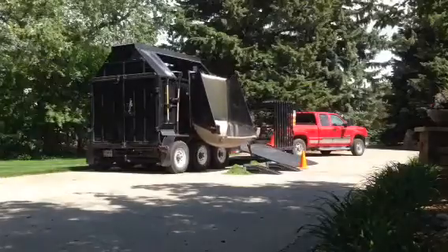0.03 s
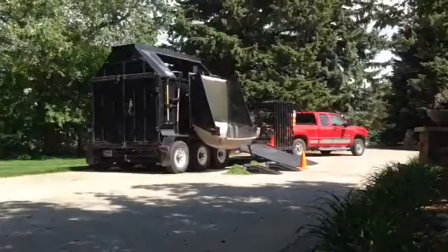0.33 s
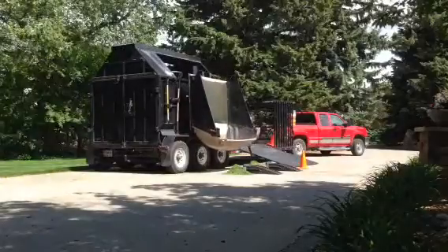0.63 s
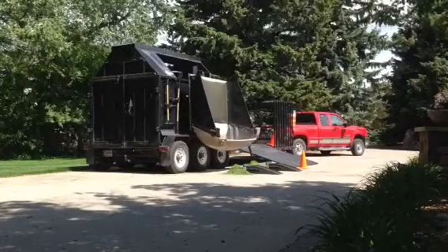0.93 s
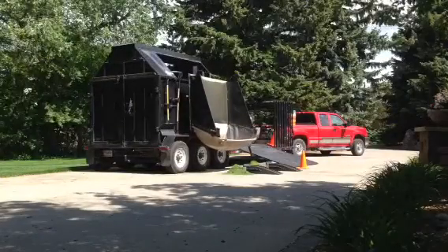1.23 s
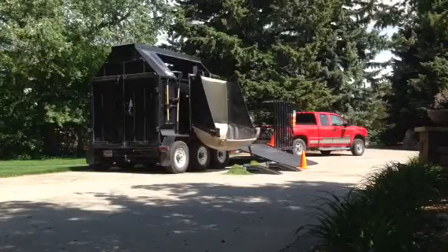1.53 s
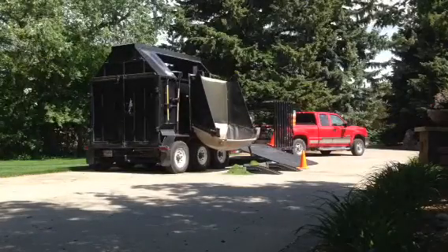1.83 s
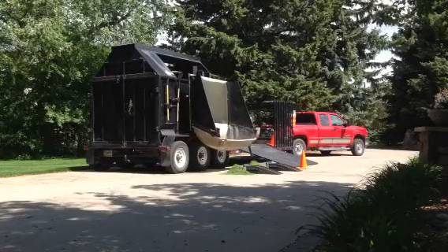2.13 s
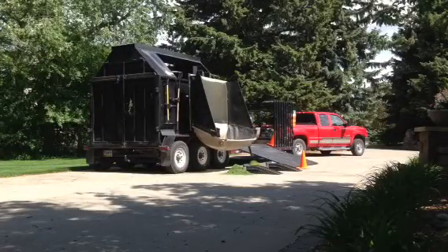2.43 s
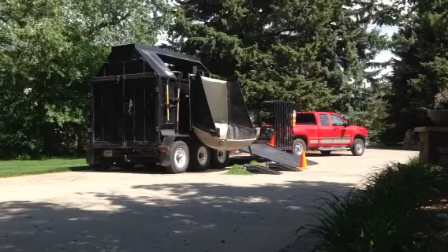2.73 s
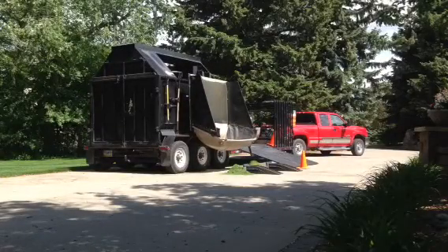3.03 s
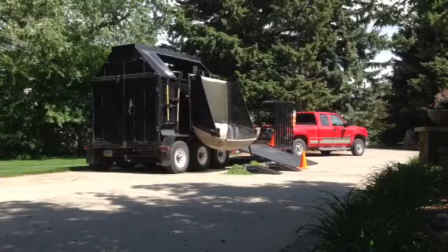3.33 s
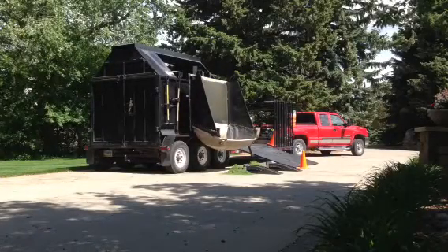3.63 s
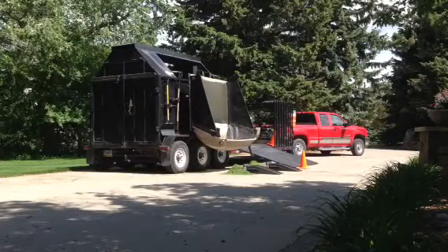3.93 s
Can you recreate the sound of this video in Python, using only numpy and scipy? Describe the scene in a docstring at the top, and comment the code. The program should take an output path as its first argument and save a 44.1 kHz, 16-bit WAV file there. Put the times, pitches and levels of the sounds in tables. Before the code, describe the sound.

A small engine driving a suction fan drones outdoors, fading and dropping to a slower beat.

```python
"""Truck loader on a driveway

A small engine drives a suction fan, some way off. Periodic exhaust puffs throb under the fan's
turbulent roar, its whines and the clatter of the machine; the whole sound fades. At about 2.35 s
the throttle is closed: the engine coasts down, then catches at a slower, loping beat."""
import sys
import numpy as np
from scipy import signal
from scipy.fft import rfft, irfft
from scipy.io import wavfile
from scipy.ndimage import uniform_filter1d

SR = 44100
rng = np.random.default_rng(int(sys.argv[2]) if len(sys.argv) > 2 else 0)


def put_to_file(sound):
    """Save the sound as 16-bit audio at rate SR, in the file named by the first command-line argument."""
    columns = np.atleast_2d(sound).T  # one column per channel
    safe = np.clip(columns, -1, 1)
    whole_steps = np.round(safe * 32767)
    wavfile.write(sys.argv[1], SR, whole_steps.astype(np.int16))


N = 176400
TIME = np.arange(N) / SR
BINS = np.fft.rfftfreq(N, 1 / SR)
THROTTLE_CLOSES_S, CATCHES_S = 2.36, 3.27
# Envelope common to the fan's roar and whines. Each row: time in seconds, level in dB.
FAN_LEVEL = [(0, -23), (0.15, -24), (0.45, -28.5), (0.85, -33), (1.3, -35.5), (1.9, -39), (2.45, -38),
             (2.8, -40.5), (3.05, -42.5), (3.5, -44.5), (3.62, -43), (4, -46)]


def exhaust(turns, closed, lope=0.13, flutter=0.069, jitter_turns=.003):
    """One puff per cycle makes a harmonic series; at low throttle strong and weak puffs alternate."""
    # Each row: time in seconds, then levels in dB of order 2, order 3 and the higher orders together.
    levels = [(0.0, -24.4, -28.4, -22.4), (0.3, -23.4, -28.9, -22.2), (0.65, -25.5, -35.4, -26.4),
              (1.0, -26.7, -32.4, -28.7), (1.3, -32.3, -41.2, -29.9), (1.7, -31.1, -33.9, -32.4),
              (1.9, -31.7, -44.6, -36.3), (2.2, -34.3, -31.9, -37.3), (2.41, -39.3, -30.6, -40.5),
              (2.53, -40.2, -42.5, -43.3), (2.67, -34.3, -27.4, -44.2), (3.02, -35.0, -29.6, -37.3),
              (3.16, -40.5, -44.4, -44.3), (3.33, -51.1, -31.3, -38.0), (3.55, -52.7, -35.5, -35.2),
              (4.0, -50.9, -35.1, -37.1)]
    # Each row: multiple of the cycle rate, relative dB at full throttle, coasting and at low throttle.
    orders = [(4, 0, -2, -6.5), (5, 1.5, 3.5, 0), (6, 1, -9.5, -9.5), (7, -26.5, -14, -48),
              (8, -10.5, -31, -6.5), (9, -30, -14.5, -24), (10, -27, -29, -41), (12, -23.5, -23, -25.5),
              (13, -23, -40, -37), (16, -16, -27, -23)]
    phase = 2 * np.pi * (turns + jitter_turns * wander(rate_hz=6.8))
    caught = ramp(CATCHES_S, length_s=0.33)
    coasting = closed - caught
    gains = np.array([amp(full) * (1 - closed) + amp(coast) * coasting + amp(low) * caught
                      for _, full, coast, low in orders])
    gains /= np.sqrt((gains ** 2).sum(0))
    waver_db = .8 + 2.6 * coasting
    higher = sum(gain * amp(waver_db * wander(rate_hz=20.4)) * np.sin(row[0] * phase)
                 for gain, row in zip(gains, orders))
    waves = [np.sin(2 * phase), np.sin(3 * phase), higher]
    puffs = sum(amp(curve(levels, column)) * wave for column, wave in enumerate(waves, 1))
    strength = 1 + lope * caught * np.cos(phase / 2) + flutter * wander(rate_hz=8.3)
    return muffler(np.sqrt(2) * puffs * strength)


def muffler(x, resonance_hz=168.5, width_hz=18.7):
    """Group delay: the muffler holds back sound near its resonance, so each puff rings on."""
    pole = resonance_hz ** 2 - BINS ** 2 + 1j * BINS * width_hz
    return irfft(rfft(x) * pole.conj() / pole, N)


def roar(turns, closed, slowed, pulsing=0.074):
    """Air rush and clatter excite resonances of the fan housing and hose, duller as the fan slows."""
    # Spectra at the loudest, faded but still at full speed, and at low speed.
    # Each row: frequency in Hz, relative spectral density in dB.
    loud_spectrum = [(150, -43), (280, -2), (370, -4.5), (460, -3), (560, -4), (700, -5.0), (850, -9.5),
                     (1050, -3), (1300, -2), (1650, -2.5), (1950, -2.5), (2250, -2.5), (2600, -7),
                     (2900, -2), (3300, -3), (3600, -6.0), (3900, -10.5), (4400, -16.5), (5200, -24),
                     (7000, -33.5), (10000, -45.5), (14000, -70)]
    faded_spectrum = [(150, -17), (280, -6.5), (370, 1), (460, -3.5), (560, -3.5), (700, -3.5), (850, 1),
                      (1050, -1.5), (1300, -1.5), (1650, -3), (1950, -0.5), (2250, -3.5), (2600, -8.5),
                      (2900, -6.5), (3300, -2), (3600, -4), (3900, -10), (4400, -18), (5200, -21.5),
                      (7000, -33.5), (10000, -47), (14000, -64)]
    slow_spectrum = [(150, -23), (280, -12), (370, -8.5), (460, -6.5), (560, -5), (700, -6.5), (850, 0.0),
                     (1050, -5), (1300, -5), (1650, -9.5), (1950, -7), (2250, -8.5), (2600, -9.5),
                     (2900, -7), (3300, -8.5), (3600, -8), (3900, -12.5), (4400, -19.0), (5200, -29),
                     (7000, -37.0), (10000, -45.5), (14000, -45)]
    periodic_share = 0.25 - 0.06 * closed
    rush = np.sqrt(1 - periodic_share) * rng.standard_normal(N)
    drive = rush + np.sqrt(periodic_share) * clatter(turns)
    drive = turbulence(drive * (1 + pulsing * np.cos(2 * np.pi * turns)))
    faded = ramp(start_s=0.68, length_s=0.56)
    fast = (1 - faded) * coloured(drive, loud_spectrum) + faded * coloured(drive, faded_spectrum)
    slow = coloured(drive, slow_spectrum)
    return amp(curve(FAN_LEVEL) - .5) * ((1 - slowed) * fast + slowed * slow)


def clatter(turns, count=150, jitter_turns=.002, drift_hz=1.623, drift_db=7.5):
    """Valve gear and fan repeat every cycle: a dense comb of harmonics whose strengths drift."""
    t = np.linspace(0, TIME[-1], num=200)
    fundamental = np.exp(2j * np.pi * (turns + jitter_turns * wander(rate_hz=5.7)))
    rates = np.linspace(0, drift_hz, num=8)[:, None]
    harmonic, out = np.ones(N, complex), np.zeros(N)
    for offsets in rng.random((count, 2, len(rates), 1)):
        size, angle = np.sin(2 * np.pi * (rates * t + offsets)).sum(1) / 2
        envelope = amp(drift_db * size) * np.exp(1j * (angle + 2 * np.pi * offsets[0, 0]))
        harmonic = harmonic * fundamental
        out += (harmonic * np.interp(TIME, t, envelope)).real
    bandwidth_hz = count * turns[-1] / TIME[-1]
    return evened(out) * np.sqrt(2 * bandwidth_hz / SR)  # as much power per Hz as unit white noise


def turbulence(x, depth_db=1.54):
    """Turbulence modulates the sound: narrow patches of the spectrum swell and sink."""
    spectra = signal.stft(x, nperseg=1024)[2]
    patches = uniform_filter1d(rng.standard_normal(spectra.shape), size=5, axis=0)  # over frequency
    patches = evened(uniform_filter1d(patches, size=14, axis=1))  # over time
    return evened(signal.istft(spectra * amp(depth_db * patches), nperseg=1024)[1][:N])


def whines(speed, slowed, slow_db=-6):
    """Narrow-band tones of fan and casing: pitch is proportional to speed, and they weaken as it falls."""
    # Each row, at full speed: frequency in Hz, width in Hz, level in dB relative to FAN_LEVEL.
    tones = [(450, 2.2, -17.5), (787, 24, -22), (900, 30, -21), (1144, 7, -20), (1220, 3.4, -30),
             (1482, 3.1, -23.5), (1772, 2.8, -21), (1968, 8.4, -14), (2355, 19, -18.5), (2817, 3.1, -20.5),
             (3024, 42, -32)]
    full_speed = speed[TIME < THROTTLE_CLOSES_S].mean()
    fan_time = np.cumsum(speed / full_speed) / SR
    out = np.zeros(N)
    for hz, width, db in tones:
        phase = 2 * np.pi * hz * fan_time
        out += amp(db) * (wander(width) * np.cos(phase) + wander(width) * np.sin(phase))
    return out * amp(curve(FAN_LEVEL) + slow_db * slowed)


def swells():
    """Single phase-modulated whines rise out of the roar and sink back, some sagging in pitch."""
    # Each row: time of the peak and length in seconds, frequency in Hz, glide in Hz per second,
    # rate of phase wander in Hz, peak level in dB relative to FAN_LEVEL.
    tones = [(.1, .3, 452, 0, 5, -13), (.15, .35, 2840, 0, 14, -12), (.33, .25, 1450, -600, 20, -13),
             (.5, .22, 1340, -800, 12, -13), (.62, .2, 1228, -200, 8, -12), (.58, .25, 1830, -150, 12, -12),
             (.55, .4, 397, 0, 3, -16), (1.1, .45, 1975, 0, 25, -14), (1.5, 2.2, 366, -2, 2.5, -17.5),
             (1.5, .6, 449, 0, 3, -13), (1.65, .5, 906, 0, 8, -13), (2.57, .25, 3030, -600, 70, -14),
             (2.78, .6, 3480, -400, 160, -11), (2.7, .5, 1400, -300, 60, -13),
             (3.62, .25, 1150, 0, 20, -13)]
    out = np.zeros(N)
    for peak_s, length, hz, glide, wander_hz, db in tones:
        t = TIME - peak_s
        window = np.cos(np.pi * np.clip(t / length, -.5, .5))
        phase = 2 * np.pi * (hz + glide * t / 2) * t + 2 * wander(wander_hz)
        out += amp(db) * window * np.sqrt(2) * np.cos(phase)
    return out * amp(curve(FAN_LEVEL))


def rumble():
    """Turbulence in the hose and the trailer box radiates low-frequency noise."""
    # Each row: frequency in Hz, relative spectral density in dB.
    spectrum = [(20, -16), (38, 2), (52, 6.5), (90, 4), (150, -3), (230, -1.5), (300, -10.5), (450, -55)]
    # Each row: time in seconds, level in dB.
    levels = [(0, -40), (.6, -34.5), (1.5, -44), (2.3, -45), (2.9, -39.5), (3.4, -44.5), (4, -44)]
    return amp(curve(levels)) * coloured(rng.standard_normal(N), spectrum)


def hiss(level_db=-68.5):
    """A faint, steady floor of nearly white noise."""
    # Each row: frequency in Hz, relative spectral density in dB.
    spectrum = [(100, 0.38), (6000, 1), (10000, -.5), (15000, -1.5)]
    return amp(level_db) * coloured(rng.standard_normal(N), spectrum)


def amp(db):
    """Decibels to amplitude ratio."""
    return 10 ** (np.asarray(db) / 20)


def evened(x):
    """Normalises to unit rms."""
    return x / np.sqrt(np.mean(x ** 2) + 1e-20)


def curve(table, column=1):
    """Interpolates one column of a time table at every sample."""
    columns = np.transpose(table)
    return np.interp(TIME, columns[0], columns[column])


def ramp(start_s, length_s):
    """Rises linearly from 0 to 1."""
    return np.clip((TIME - start_s) / length_s, 0, 1)


def coloured(x, spectrum):
    """Filters x by a spectrum interpolated over log frequency, to unit rms."""
    hz, db = np.transpose(spectrum)
    gain = amp(np.interp(np.log(BINS + 1), np.log(hz + 1), db))
    return evened(irfft(rfft(x) * gain, N))


def wander(rate_hz):
    """Low-pass noise of unit rms, fluctuating up to about this rate."""
    return evened(irfft(rfft(rng.standard_normal(N)) * np.exp(-(BINS / rate_hz) ** 2), N))


def scene():
    """Superposition of the sources; the engine's speed drives exhaust, roar and whines."""
    # Each row: time in seconds, engine cycles per second.
    cycle_rates = [(0.0, 30.85), (0.5, 30.618), (1.1, 30.404), (1.7, 30.282), (2.33, 30.619), (2.5, 29.116),
                   (2.75, 27.707), (3.0, 25.75), (3.25, 23.235), (3.45, 22.683), (3.7, 22.157),
                   (4.0, 22.147)]
    speed = curve(cycle_rates)
    turns = np.cumsum(speed) / SR - .0045 * speed[0]  # the first cycle starts 4.5 ms in
    closed = ramp(THROTTLE_CLOSES_S, length_s=.1)
    slowed = np.clip(1.3 * (speed.max() - speed) / np.ptp(speed), 0, 1)
    machine = exhaust(turns, closed) + roar(turns, closed, slowed) + whines(speed, slowed)
    return (machine + swells() + rumble())[None]


def record(dry):
    """Hiss is added, then a low-pass filter limits the bandwidth."""
    low_pass = signal.firwin(511, cutoff=15330, window=("kaiser", 9), fs=SR)
    return signal.oaconvolve(dry + hiss(), low_pass[None], "same")


dry = scene()
out = record(dry)
put_to_file(out)
```